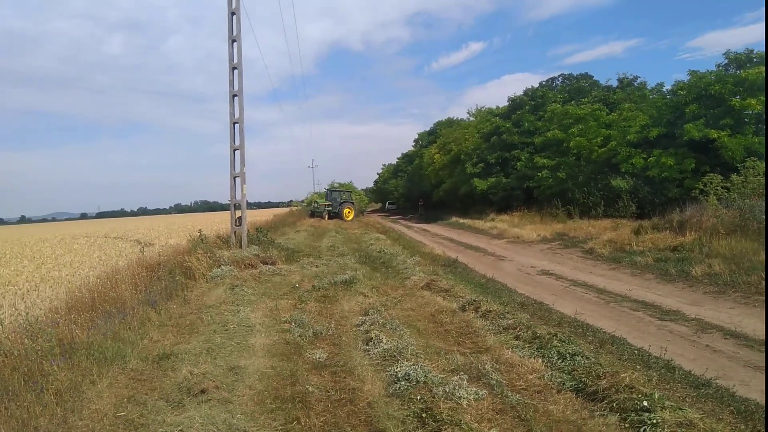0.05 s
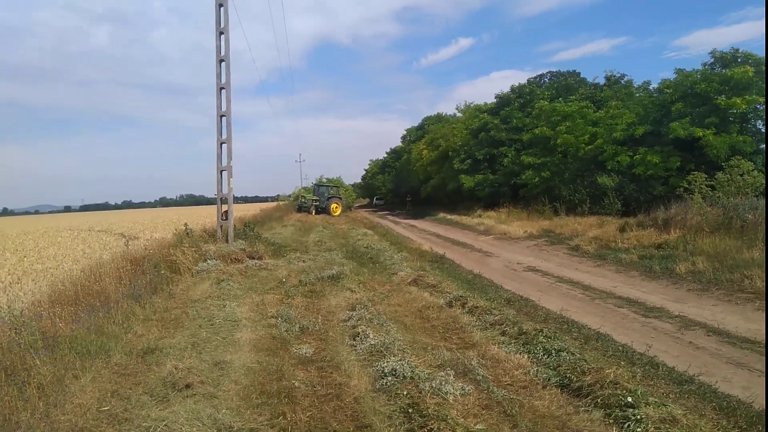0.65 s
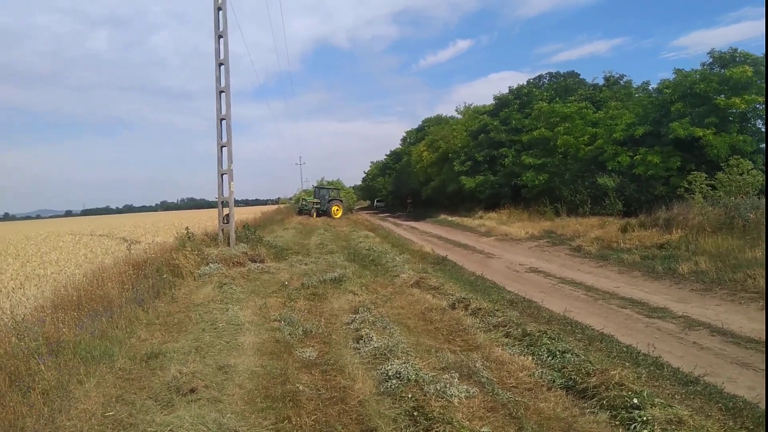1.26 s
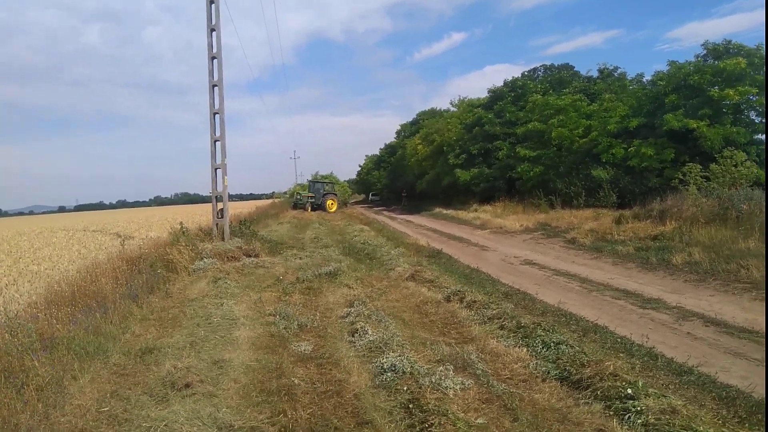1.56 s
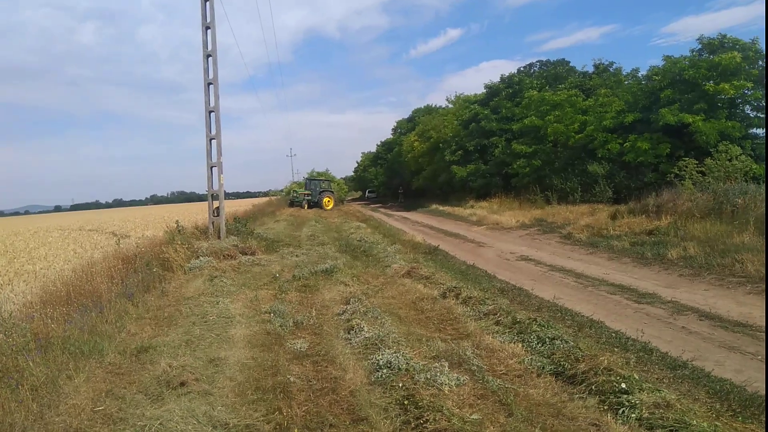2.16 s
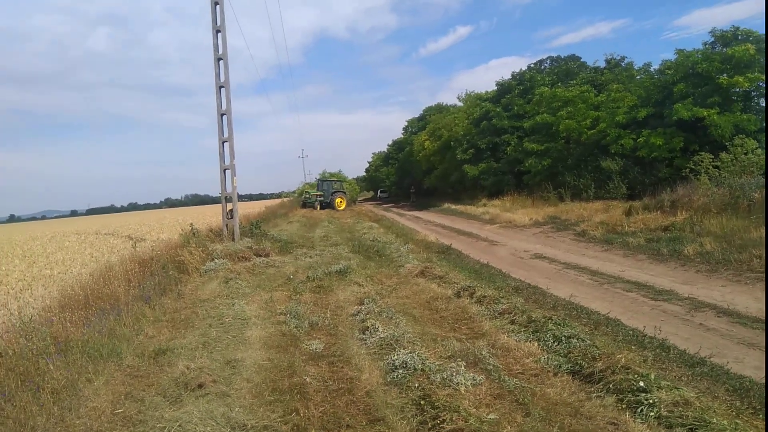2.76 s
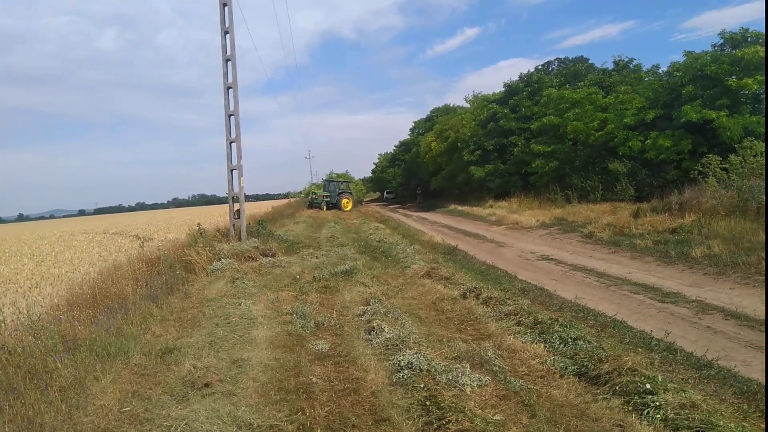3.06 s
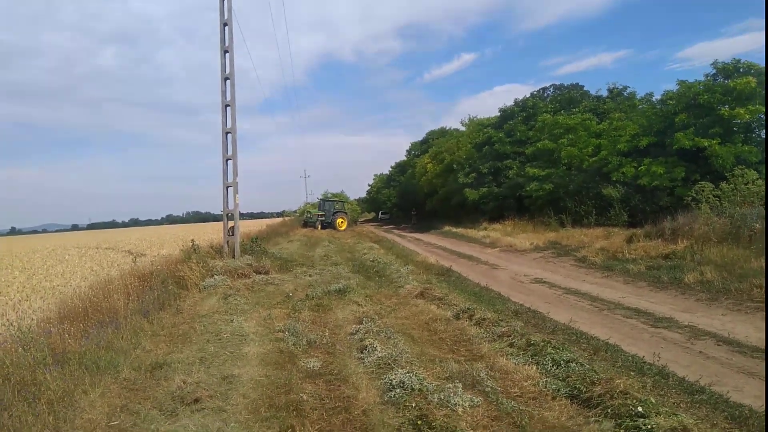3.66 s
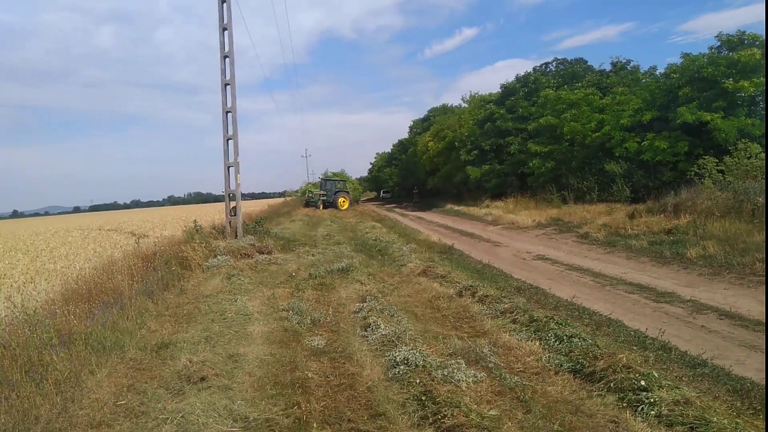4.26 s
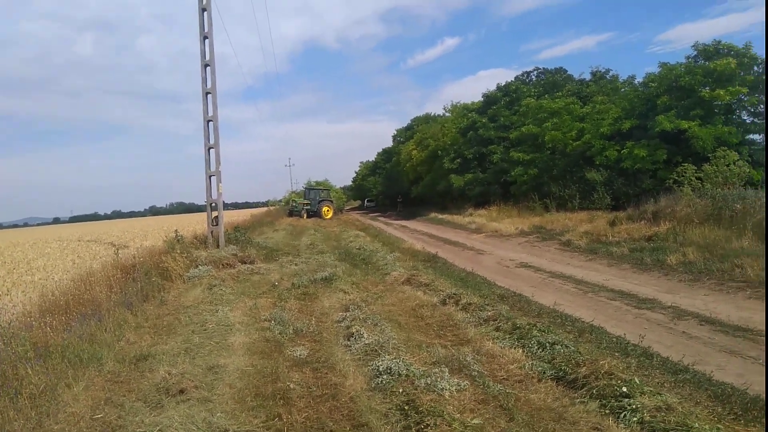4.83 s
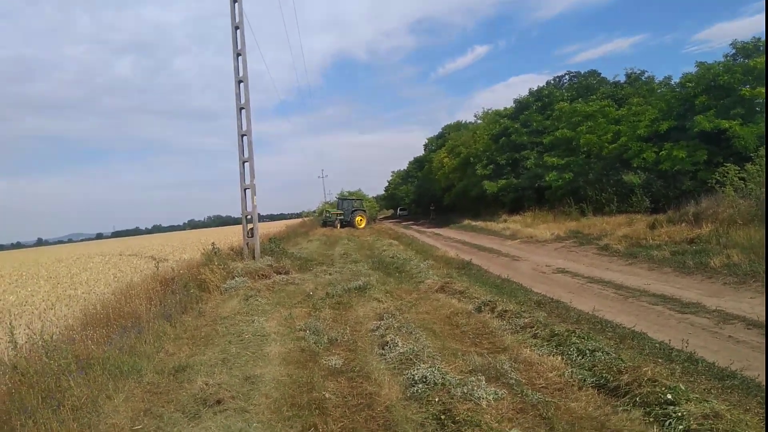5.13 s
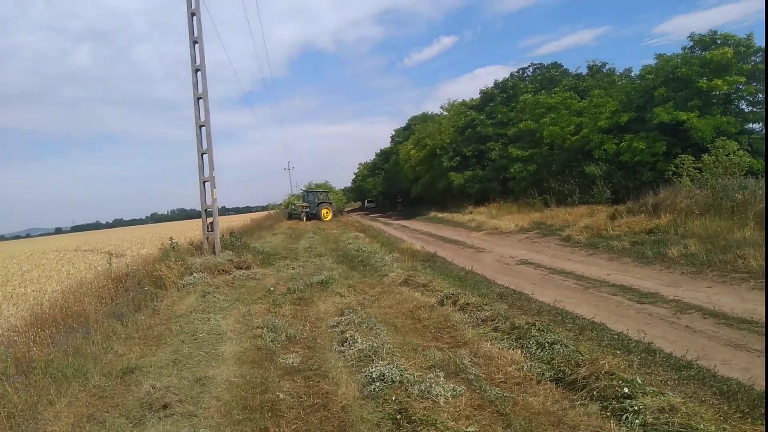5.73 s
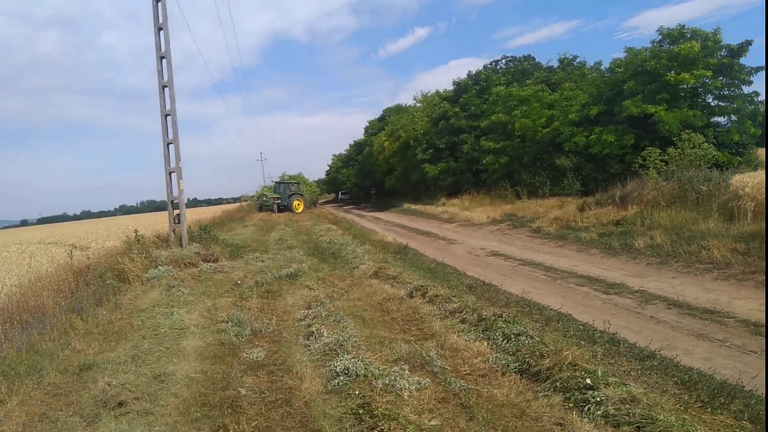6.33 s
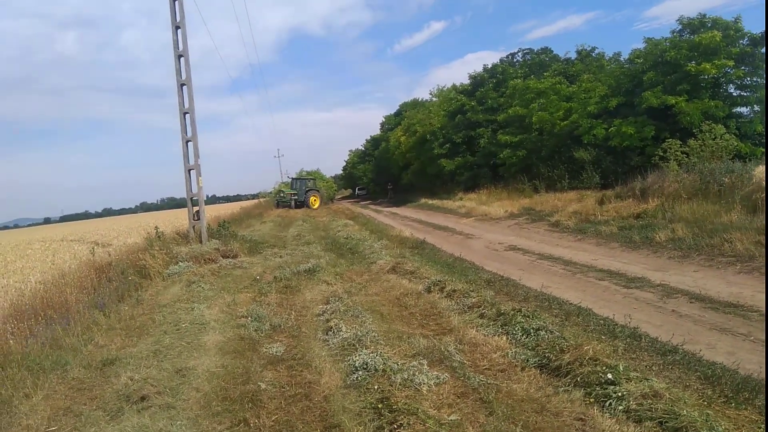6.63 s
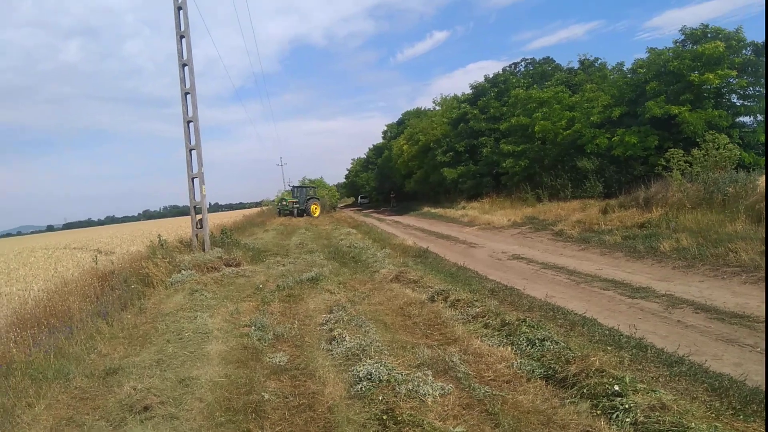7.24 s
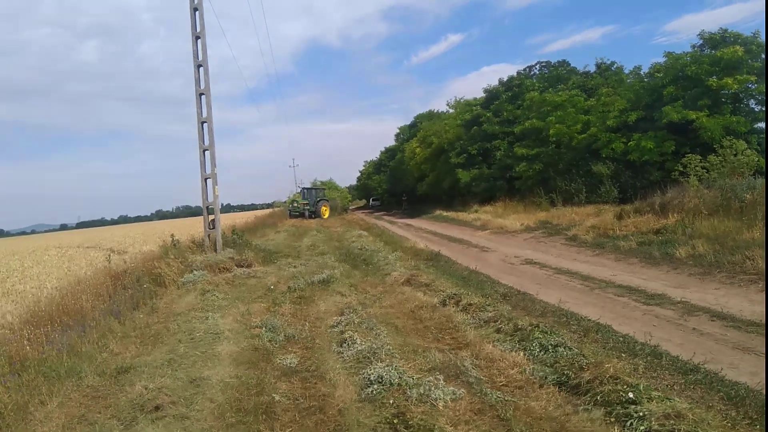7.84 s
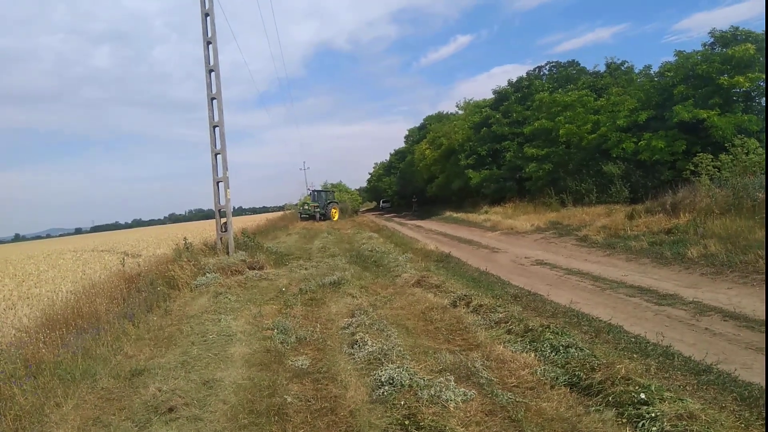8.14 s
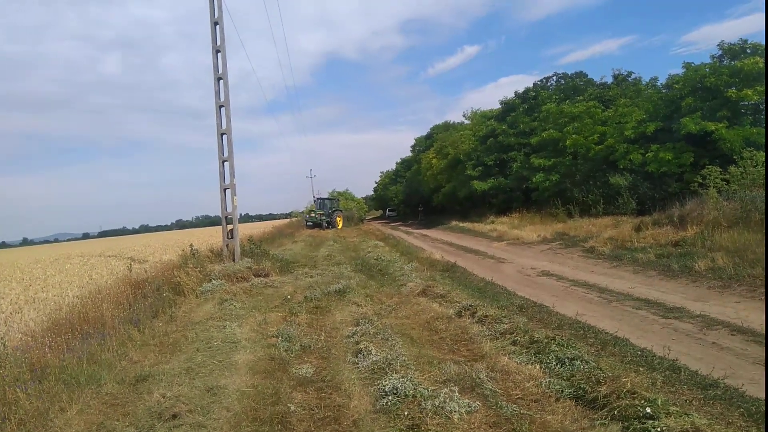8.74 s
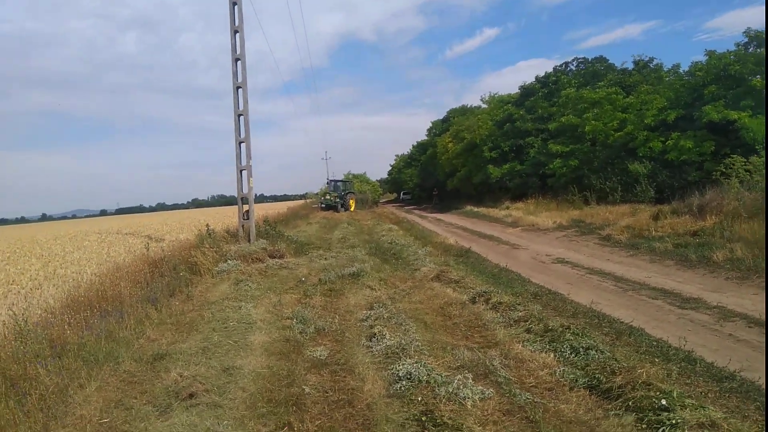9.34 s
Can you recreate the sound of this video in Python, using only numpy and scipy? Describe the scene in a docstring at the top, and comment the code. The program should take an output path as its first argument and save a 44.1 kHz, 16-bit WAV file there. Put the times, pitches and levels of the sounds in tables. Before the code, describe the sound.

Wind buffets the microphone throughout in an open field, a low, uneven rumble with fluttering gusts and short thumps, over a very faint hiss. It is the loudest sound, hitting hardest around 2.6 to 3.2 seconds and again from 4.3 to 6 seconds. Far away, a diesel tractor idles with a quick, rattling clatter and slight metallic ringing from its mower, fading somewhat around 2 to 4 seconds. A small bird gives faint, short, high chirps near 1.8, 2.6, 3.6 and 6 seconds. A faint, close rustle like a sleeve comes around 5 seconds. The engine then begins to quicken, growing louder and brighter around 7 seconds and climbing steadily until about 9 seconds. Its exhaust drone comes forward from about 8 seconds and holds, under lighter gusts, until the end at 9.5 seconds.

```python
"""Far across a field a four-cylinder diesel tractor idles, each firing an impulse that rattles its block
and rings its mower; ground echo colours the clatter and its treble shimmers. From the start, turbulence
buffets the microphone over a faint hiss. Near 2 s a small bird begins to chirp in the trees, and around
5 s comes a faint, close rustle, like a sleeve. The engine then picks up from about 27 to 38 firings
a second, and its exhaust note comes forward."""
import sys
import numpy as np
from scipy import signal
from scipy.fft import rfft, irfft, next_fast_len
from scipy.io import wavfile
from scipy.ndimage import uniform_filter1d, minimum_filter1d

SR = 44100
rng = np.random.default_rng(int(sys.argv[2]) if len(sys.argv) > 2 else 0)


def wav_record(signal):
    """Record a signal, one row per channel, as 16-bit PCM in the file named by sys.argv[1]."""
    frames = np.transpose(np.atleast_2d(signal))
    bounded = np.clip(frames, -1, 1)
    # unit amplitude maps onto the largest positive 16-bit level
    quanta = np.round(bounded * 32767).astype(np.int16)
    wavfile.write(sys.argv[1], SR, quanta)


N = 418509
TIME = np.arange(N) / SR

# Levels in the tables are relative; a spectrum gives only a shape.
# engine speed: time_s, firing_rate_hz
FIRING_RATE = [(0, 26.48), (4.9, 26.54), (5.3, 27.22), (5.9, 28.17), (6.7, 28.35), (7.3, 30.92),
               (8.1, 33.54), (8.6, 35.97), (9.1, 37.68), (9.49, 37.8)]
# knock of each cylinder: level_db
CYLINDERS_DB = [-3, -6.5, -5.5, -3.5]
# firings harder than the average: time_s, extra_db
HARD_KNOCKS = [(5.225, 6.5), (6.23, 6), (6.795, 2.5), (7.097, 5), (7.23, 2.5), (7.328, 2), (7.458, 3)]
# block spectra at idle, picking up and at speed: frequency_hz, level_db
BLOCK_IDLE = [(780, -42), (1010, -12.5), (1120, -2), (1220, -1.5), (1350, 1), (1510, 7), (1900, 8),
              (2050, 0), (2400, 1.5), (2540, -12), (2780, -7.5), (3050, -9), (3300, -28.5), (4100, -31),
              (4450, -53), (6000, -87)]
BLOCK_PICKUP = [(780, -57), (930, -28.5), (1100, -2.5), (1260, 9), (1400, 0), (1550, 4.5), (1950, 6.5),
                (2350, -4), (2650, -1.5), (3050, -17), (3300, -14.5), (3650, -20), (4050, -25),
                (4450, -54.5), (6000, -72)]
BLOCK_REVVED = [(780, -81), (900, -23.5), (1010, 1.5), (1130, -1), (1350, -1.5), (1550, 3.5), (1700, -0.5),
                (2100, -3), (2500, -5.5), (2780, -24), (3080, -12), (3400, -31.5), (3950, -23.5),
                (4600, -50)]
# injector and panel spectra at idle and under load: frequency_hz, level_db
TICKS_IDLE = [(3000, -43), (5050, -19.5), (5450, -8.5), (6500, -2), (7100, -7.5), (7600, -11), (8700, -8),
              (10000, -25.5), (14500, -51)]
TICKS_LOADED = [(3000, -36), (4900, -16), (5450, 3), (6300, 8), (7100, 4.5), (7600, -10), (8500, -7),
                (9400, -21), (10000, -22), (12500, -14), (15000, -52)]
# cancellation by the ground echo at idle: centre_hz, width_hz, gain_db
GROUND_NOTCHES = [(1226, 35, -10), (1749, 63, -9), (2030, 15, -5.5), (2650, 68, -5.5)]
# resonances of injectors and panels at idle, and of one panel at speed: centre_hz, width_hz, gain_db
IDLE_RINGS = [(5400, 80, 7), (5880, 90, 7), (6850, 80, 13)]
REVVED_RING = [(1131, 11, 5)]
# body of the clatter: time_s, level_db
BODY_LEVEL = [(0, -42.5), (1.4, -47), (2.3, -52.5), (3.1, -55), (4.1, -51.5), (5.9, -47.5), (6.7, -40.5),
              (7.1, -38), (7.9, -39.5), (9.49, -42)]
# its treble, which comes and goes: time_s, rasp_db, ticks_db
TREBLE_LEVEL = [(0, -57, -65.5), (.5, -53.5, -64), (.9, -63.5, -71), (1.4, -67, -73.5), (2.2, -91, -85),
                (2.5, -74.5, -77), (3.1, -76, -83.5), (4.5, -83, -85.5), (4.62, -61, -77.5),
                (5.1, -80, -84.5), (5.28, -61, -65), (5.44, -55, -70), (5.6, -65, -82), (6.6, -69, -71.5),
                (6.86, -53, -68), (7.2, -50.5, -52), (7.5, -52, -53), (7.88, -61.5, -73.5),
                (8.25, -60, -60.5), (8.6, -54, -57.5), (9.02, -57, -65.5), (9.49, -50.5, -60.5)]
# exhaust spectrum: frequency_hz, level_db
EXHAUST = [(200, -34.5), (420, -18), (600, 9), (690, 2.5), (800, -13.5), (1000, -31.5), (2500, -74.5)]
# exhaust strength: time_s, level_db
EXHAUST_LEVEL = [(0, -64), (2.2, -82), (6.8, -78), (7.1, -67), (7.8, -65), (8.2, -58), (8.6, -56.5),
                 (9.49, -57)]
# spectra of wind, its gentle flutter and the rasp of hard gusts: frequency_hz, level_db
WIND = [(20, -22), (33, -16), (50, -6.5), (68, 3.5), (120, 3.5), (190, -1.5), (340, -11.5), (520, -25.5),
        (640, -37.5), (800, -66), (1150, -97)]
SOFT_FLUTTER = [(170, -33.5), (255, -1.5), (330, -5), (450, -25.5), (700, -60), (1200, -91)]
GUST_RASP = [(400, -18), (600, 21), (1000, -2), (1300, -12), (2000, -58)]
# breeze between gusts: time_s, rumble_db, flutter_db
BREEZE = [(0, -28, -38.5), (1.3, -31, -46), (1.8, -31.5, -50.5), (2.05, -29.5, -57), (2.5, -34, -59.5),
          (2.75, -35.5, -43.5), (3.3, -27.5, -39.5), (3.8, -31, -65), (4.0, -41.5, -34), (4.2, -34, -66.5),
          (4.5, -28, -38), (5.2, -25.5, -41), (6.15, -23, -41), (6.95, -36, -79), (7.35, -25, -39),
          (7.9, -32.5, -56), (8.6, -34.5, -57), (9.49, -26, -40)]
# gusts on the microphone: start_s, length_s, strength_db, brightness_db
GUSTS = [(0.169, 0.038, -27, 9.5), (0.383, 0.059, -20, 7), (0.56, 0.046, -18.5, 5),
         (0.676, 0.079, -27.5, 9), (0.925, 0.016, -15.5, -1.5), (1.141, 0.039, -18.5, 4),
         (1.21, 0.049, -19.5, 6.5), (1.33, 0.057, -15.5, 4.5), (1.425, 0.02, -23, 10),
         (1.64, 0.089, -23.5, 6.5), (1.844, 0.074, -20, -4.5), (2.047, 0.015, -23.5, -4),
         (2.185, 0.026, -25, 0.5), (2.562, 0.22, -17.5, 3), (2.8, 0.17, -19.5, 4),
         (2.976, 0.22, -16.5, 5.5), (3.239, 0.063, -21, 13.5), (3.469, 0.073, -19.5, -5.5),
         (3.59, 0.066, -22.5, -1.5), (3.897, 0.036, -23.5, 6), (3.977, 0.13, -22, 1),
         (4.248, 0.03, -23, 4.5), (4.302, 0.2, -17, 4.5), (4.621, 0.036, -22, 6.5), (4.687, 0.026, -15, 9),
         (4.801, .14, -17, 4.5), (4.992, 0.065, -23, 4.5), (5.274, 0.097, -22, 11), (5.513, 0.24, -20, 5.5),
         (5.785, 0.17, -21, 8.5), (5.988, 0.17, -22, 7.5), (6.48, 0.11, -27, -2), (6.629, 0.039, -24, 0),
         (6.869, 0.013, -26.5, -8), (7.166, 0.17, -24, -3.5), (7.495, 0.031, -23, 3.5),
         (7.687, 0.017, -23, -13), (7.887, .04, -28.5, -10), (8.056, 0.13, -27.5, 7.5),
         (8.255, 0.086, -28, 6.5), (8.709, 0.13, -28, 8.5), (8.962, 0.041, -22.5, 12),
         (9.067, 0.066, -24.5, 13.5), (9.14, 0.1, -32.5, 18), (9.262, 0.035, -22.5, 10.5),
         (9.365, 0.037, -21.5, 9.5)]
# spectra of open air, dry sizzle and close rustle: frequency_hz, level_db
AIR_HISS = [(100, -3.5), (800, 5.5), (3500, 8.5), (5000, 5.5), (9000, -6), (13000, 0), (15500, -16)]
SIZZLE = [(5000, -26), (8000, -8), (8700, -1.5), (9300, 4.5), (9900, -6), (11300, -5.5), (13000, -0.5),
          (13800, -7), (14600, -21)]
RUSTLE_SPECTRUM = [(3000, -12), (7000, -13), (8400, 8.5), (10500, -10), (14000, 3), (16000, -7)]
# sizzle of the field: time_s, level_db
SIZZLE_LEVEL = [(0, -82.5), (4.2, -83.5), (6.5, -77), (9.49, -76.5)]
# resonances of the mower: middle_s, half_width_s, pitch_hz, level_db
MOWER_RINGS = [(0.12, .06, 3630, -65), (0.33, 0.054, 3830, -63), (5.27, 0.026, 5950, -71),
               (5.42, .1, 3980, -71), (5.4, .03, 5470, -71), (5.85, .15, 3915, -74.5),
               (8.5, 0.15, 3026, -58), (8.55, 0.11, 3710, -67), (8.64, 0.13, 6530, -64)]
# single eddies striking the microphone: time_s, peak_db, top_hz
BUFFETS = [(0.201, -21, 674), (0.403, -23, 620), (1.236, -21.5, 550), (1.367, -21, 620), (2.621, -17, 700),
           (2.676, -22, 680), (2.774, -24, 720), (2.877, -16.5, 660), (2.955, -17, 640),
           (3.021, -12.5, 770), (3.059, -26, 1150), (3.071, -17.5, 1050), (3.105, -22.5, 1100),
           (3.145, -25, 950), (3.188, -19.5, 680), (4.367, -10, 676), (4.385, -22.5, 1000),
           (4.499, -20, 680), (4.716, -19, 640), (4.871, -19.5, 700), (4.91, -15, 720), (4.929, -22, 800),
           (5.354, -16.5, 660), (5.663, -22, 640), (5.802, -21.5, 597), (5.871, -24, 750),
           (6.12, -19.5, 640), (7.258, -17.5, 540), (9.132, -22, 660), (9.286, -18, 680)]
# bird notes: start_s, length_s, pitch_hz, level_db
CHIRPS = [(1.782, 0.016, 3820, -72), (1.812, 0.045, 3970, -64), (2.64, 0.13, 3955, -74),
          (3.575, 0.14, 3965, -74), (5.972, 0.025, 3890, -65)]
# faint high rustles close to the microphone: middle_s, half_width_s, level_db
RUSTLES = [(4.619, 0.092, -71.5), (5.022, 0.032, -62), (5.18, .22, -72)]


def gain_of(db):
    """Amplitude grows tenfold per 20 dB."""
    return np.exp(np.asarray(db) * (np.log(10) / 20))


def unit_rms(x):
    """Normalisation to an rms of 1."""
    return x / np.sqrt(np.mean(x ** 2) + 1e-20)


def curve(rows, column=1):
    """Linear interpolation of a table column in time."""
    rows = np.asarray(rows)
    return np.interp(TIME, rows[:, 0], rows[:, column])


def colour(x, spectrum, bands=()):
    """Spectral shaping, with optional Gaussian peaks or notches; rms 1."""
    size = next_fast_len(N)
    hz = np.fft.rfftfreq(size, 1 / SR)
    knot_hz, knot_db = np.transpose(spectrum)
    db = np.interp(np.log(hz + 1), np.log(knot_hz + 1), knot_db)
    db += sum(gain_db * np.exp(-.5 * ((hz - centre) / width) ** 2) for centre, width, gain_db in bands)
    return unit_rms(irfft(rfft(x, size) * gain_of(db), size)[:N])


def noise(spectrum):
    """White noise filtered to a spectrum."""
    return colour(rng.standard_normal(N), spectrum)


def drift(per_s):
    """Random modulation that turns about per_s times a second; rms 1."""
    knots = rng.standard_normal(4000)
    return unit_rms(np.interp(TIME * per_s, np.arange(len(knots)), knots))


def steadied(x, seconds):
    """Division by the running rms holds the level near 1."""
    size = max(int(seconds * SR), 8)
    return x / np.sqrt(abs(uniform_filter1d(uniform_filter1d(x ** 2, size), size)) + 1e-9)


def add(mix, start_s, sound):
    """Superposition of a sound on the mix."""
    part = mix[max(round(start_s * SR), 0):][:len(sound)]
    part += sound[:len(part)]


def split(x, hz):
    """A complementary crossover: the parts below and above hz."""
    low = signal.sosfiltfilt(signal.butter(4, hz, fs=SR, output="sos"), x)
    return low, x - low


def bandpass(x, order, low_hz, high_hz):
    """A causal filter, ringing within its passband."""
    return signal.sosfilt(signal.butter(order, [low_hz, high_hz], "bandpass", fs=SR, output="sos"), x)


def knocks(rise_s, decay_s, whirr, uneven_db, alike, grain_db, lead_cycles):
    """Impulse excitation: each firing starts a rattle, partly alike for one cylinder, over gear whirr."""
    rate_hz = curve(FIRING_RATE)
    cycles = np.cumsum(rate_hz) / SR + .66 + lead_cycles  # starts part-way through a firing
    firing, age_s = cycles.astype(int), cycles % 1 / rate_hz
    cylinder = firing % len(CYLINDERS_DB)
    strength, jitter = rng.standard_normal((400, 2)).T
    strength_db = uneven_db * np.tanh(strength) + np.resize(CYLINDERS_DB, len(strength))
    for time_s, extra_db in HARD_KNOCKS:
        strength_db[firing[int(time_s * SR)]] = np.mean(CYLINDERS_DB) + extra_db
    burst = (1 - np.exp(-(age_s / rise_s) ** 2)) * np.exp(-age_s / decay_s)
    sample = np.round((age_s + .0001 * jitter[firing]) * SR).astype(int)
    own_rattle = rng.standard_normal((len(CYLINDERS_DB), SR))[cylinder, sample]
    rattle = np.sqrt(alike) * own_rattle + np.sqrt(1 - alike) * rng.standard_normal(N)
    rattle *= unit_rms(gain_of(grain_db * drift(400)))
    # the whirr dips as the engine pulls up, so the strokes stand out
    gears = whirr * np.interp(rate_hz, [27, 28.3, 31, 35], [1.7, 1.1, 1, 1.5]) * rng.standard_normal(N)
    return gain_of(strength_db)[firing] * burst / burst.max() * rattle + gears


def wavering_echo(x, share, delay_s, wander_s, per_s):
    """Comb filtering: a second path wanders in length, so peaks and notches slide."""
    echo = np.interp(TIME - delay_s - wander_s * drift(per_s), TIME, x)
    return (x + share * echo) / np.hypot(1, share)


def shimmer(x, depth_db=5):
    """Band-wise modulation: narrow bands fade and return at random, the treble most."""
    hz, frames, spectra = signal.stft(x, SR, nperseg=640, noverlap=480)
    brief, lasting = rng.standard_normal((len(frames), len(hz), 2)).T
    brief = unit_rms(uniform_filter1d(uniform_filter1d(brief, size=2, axis=0), size=16, axis=1))
    lasting = unit_rms(uniform_filter1d(uniform_filter1d(lasting, size=3, axis=0), size=110, axis=1))
    band_depth_db = depth_db * np.interp(hz, [1500, 3600], [.5, 1])[:, None]
    gain = gain_of(band_depth_db * unit_rms(brief + lasting))
    gain /= np.sqrt(np.mean(gain ** 2, axis=1, keepdims=True))
    return signal.istft(spectra * gain, SR, nperseg=640, noverlap=480)[1][:N]


def engine_block(drive, idle, revved):
    """Resonant response of the block, crossfaded between three speeds."""
    return (idle * colour(drive, BLOCK_IDLE, GROUND_NOTCHES)
            + (1 - idle - revved) * colour(drive, BLOCK_PICKUP)
            + revved * colour(drive, BLOCK_REVVED, REVVED_RING))


def tractor(rasp_db=1, ticks_db=-2.5):
    """Source and filter: the firings drive block, injectors, panels, mower and exhaust."""
    idle = np.interp(TIME, [5.4, 6.8], [1, 0])
    loaded = np.interp(TIME, [6.9, 7.15], [0, 1])
    revved = np.interp(TIME, [7.4, 8.2], [0, 1])
    thuds = knocks(rise_s=.0048, decay_s=.011, whirr=.185, uneven_db=1.2, alike=.5, grain_db=1.5,
                   lead_cycles=.02 + .03 * idle)
    clanks = knocks(rise_s=.006, decay_s=.0075, whirr=.14, uneven_db=2, alike=.1, grain_db=2.5,
                    lead_cycles=.08)
    taps = knocks(rise_s=.009, decay_s=.005, whirr=.16, uneven_db=2.5, alike=.25, grain_db=1.5,
                  lead_cycles=.07 + .07 * idle)
    body, _ = split(engine_block(thuds, idle, revved), hz=2660)
    body = wavering_echo(body, share=.5, delay_s=.0045, wander_s=.0002, per_s=6)
    _, rasp = split(engine_block(clanks, idle, revved), hz=2710)
    rasp = steadied(wavering_echo(rasp, share=.4, delay_s=.0026, wander_s=.00014, per_s=11), seconds=.4)
    ticks = (1 - loaded) * colour(taps, TICKS_IDLE, IDLE_RINGS) + loaded * colour(taps, TICKS_LOADED)
    ticks = wavering_echo(ticks, share=.65, delay_s=.0031, wander_s=.00005, per_s=6)
    clatter = gain_of(curve(BODY_LEVEL)) * body + gain_of(curve(TREBLE_LEVEL) + rasp_db) * rasp
    clatter += gain_of(curve(TREBLE_LEVEL, column=2) + ticks_db) * ticks
    exhaust = gain_of(curve(EXHAUST_LEVEL)) * colour(thuds, EXHAUST)
    return shimmer(clatter) + mower(clanks) + exhaust


def swells(rows, attack_s, release_s):
    """Incoherent addition: envelopes that rise, hold and decay sum in power."""
    power, t = np.zeros(N), TIME[:SR]
    for start_s, length_s, db in rows:
        rise = np.sin(np.pi / 2 * np.minimum(t / attack_s, 1)) ** 2
        fall = np.exp(-np.maximum(t - length_s, 0) / release_s)
        add(power, start_s, (gain_of(db) * rise * fall) ** 2)
    return np.sqrt(power)


def wind(attack_s=.017, release_s=.012, full_gust_db=-13.5, full_flutter_db=-29, rumble_db=-.03):
    """Turbulent pressure on the microphone port: a rumble, and a flutter that brightens in gusts."""
    growth = 1.182  # dB of flutter per dB of gust strength
    start_s, length_s, strength_db, brightness_db = np.transpose(GUSTS)
    flutter_db = full_flutter_db + growth * (strength_db - full_gust_db) + brightness_db
    gust_rumble = swells(zip(start_s, length_s, strength_db), attack_s, release_s)
    gust_flutter = swells(zip(start_s, length_s, flutter_db), attack_s * growth, release_s / growth)
    lumps_db = 5 * np.tanh(drift(22)) - 2
    rumble_gain = np.hypot(gust_rumble, gain_of(curve(BREEZE) + lumps_db))
    flutter_gain = np.hypot(gust_flutter, gain_of(curve(BREEZE, column=2) + growth * lumps_db))
    low, high = split(noise(WIND), hz=250)
    eddies = drift(45)
    churn = gain_of(4.4 * eddies + 4.5 * drift(110))
    rumble = steadied(low * gain_of(3 * eddies), seconds=.05) * rumble_gain * gain_of(rumble_db)
    hardness = np.interp(20 * np.log10(flutter_gain), [-46, -28], [.1, .9])
    flutter = hardness * unit_rms(high) + (1 - hardness) * noise(SOFT_FLUTTER)
    flutter = steadied(flutter * churn, seconds=.05) * flutter_gain
    # only hard, lasting gusts bring a rasp near 1 kHz
    lasting_db = 20 * np.log10(uniform_filter1d(flutter_gain, size=SR // 7))
    rasp = noise(GUST_RASP) * gain_of(-58 + 4.7 * np.minimum(lasting_db + 30, 5))
    return rumble + flutter + rasp * churn


def field(hiss_db=-82):
    """Broadband ambient noise: even hiss, with a dry sizzle and a close rustle that both shimmer."""
    rustle_gain = rustle_envelope()
    sizzle = gain_of(curve(SIZZLE_LEVEL) + 1.1 * drift(24)) * noise(SIZZLE)
    hiss = gain_of(hiss_db) * noise(AIR_HISS)
    return hiss + shimmer(sizzle + rustle_gain * noise(RUSTLE_SPECTRUM))


def mower(drive, width_hz=150):
    """Forced vibration: the firings shake the mower's metal; single resonances swell and fade."""
    out = np.zeros(N)
    for middle_s, half_width_s, hz, db in MOWER_RINGS:
        ring = unit_rms(bandpass(drive, 2, hz - width_hz / 2, hz + width_hz / 2))
        out += gain_of(db) * np.exp(-.5 * ((TIME - middle_s) / half_width_s) ** 2) * ring
    return out


def buffets(swing_s=.0018, crackle_s=.0065, bass_cut_hz=130):
    """Transient response: an eddy's pressure jump and crackle ring the microphone's bass cut."""
    out, t = np.zeros(N), np.arange(SR // 16) / SR - .002
    for (time_s, peak_db, top_hz), polarity in zip(BUFFETS, rng.choice([-1, 1], len(BUFFETS))):
        jump = np.sign(t) * np.exp(-abs(t) / swing_s)
        grain = unit_rms(uniform_filter1d(rng.standard_normal(len(t)), size=20))
        crackle = .05 * (t > 0) * np.exp(-abs(t) / crackle_s) * grain
        slap = bandpass(jump + crackle, 8, bass_cut_hz, top_hz)
        add(out, time_s - .004, polarity * gain_of(peak_db) * slap / abs(slap).max())
    return out


def bird(hoarseness=.011, echo_decay_s=.025, wet=.8):
    """Random frequency modulation roughens short, level notes, which reverberate among the trees."""
    notes = np.zeros(N)
    for start_s, length_s, hz, db in CHIRPS:
        arch = 1 - np.linspace(-1, 1, int(length_s * SR)) ** 2
        pitch_hz = hz * (1 + hoarseness * drift(300)[:len(arch)])
        add(notes, start_s, gain_of(db) * unit_rms(arch * np.sin(2 * np.pi * np.cumsum(pitch_hz) / SR)))
    t = TIME[:SR // 2]
    trees = rng.standard_normal(len(t)) * np.exp(-t / echo_decay_s)
    return notes / 2 + wet * signal.fftconvolve(notes, trees / np.linalg.norm(trees))[:N]


def rustle_envelope():
    """Amplitude modulation: each rustle, like a sleeve or handling, swells and fades with random grain."""
    power = sum(gain_of(2 * db) / (1 + ((TIME - middle_s) / half_width_s) ** 2) ** 2
                for middle_s, half_width_s, db in RUSTLES)
    return np.sqrt(power) * gain_of(1.2 * drift(25) + 2.5 * drift(250))


def scene():
    """Superposition of all sources at one microphone."""
    return (tractor() + wind() + buffets() + bird() + field())[None]


def record(dry, ceiling_db=-7.3, cutoff_hz=15700):
    """Peak limiting holds down the strongest gusts; a low-pass filter then bounds the band."""
    allowed = np.minimum(1, gain_of(ceiling_db) / (abs(dry[0]) + 1e-9))
    held = minimum_filter1d(allowed, size=900)
    gain = uniform_filter1d(uniform_filter1d(held, size=400), size=400)
    lowpass = signal.firwin(511, cutoff_hz, window=("kaiser", 9), fs=SR)
    return signal.oaconvolve(dry * gain, lowpass[None], "same")


dry = scene()
out = record(dry)
wav_record(out)
```